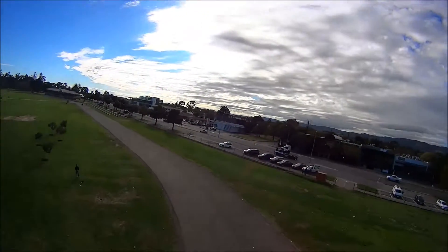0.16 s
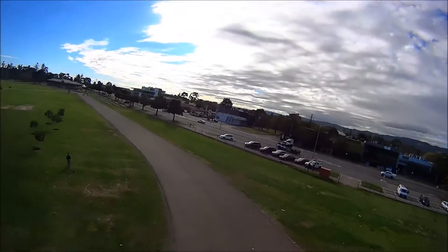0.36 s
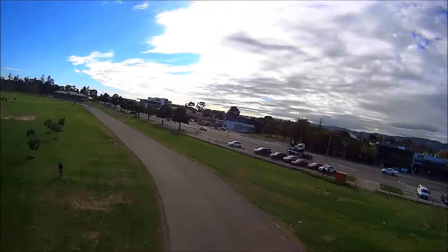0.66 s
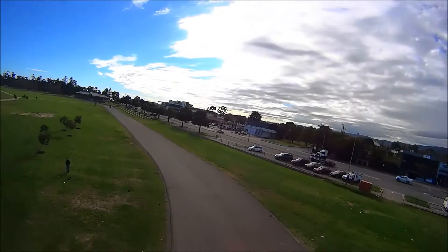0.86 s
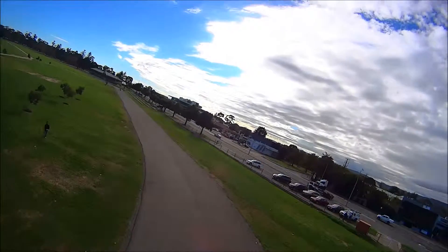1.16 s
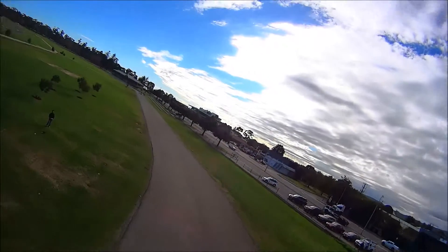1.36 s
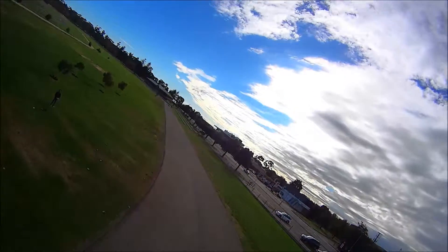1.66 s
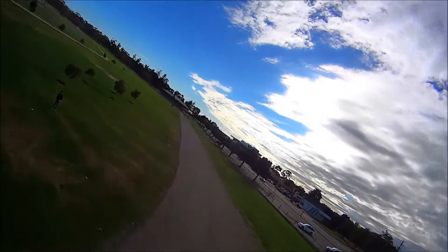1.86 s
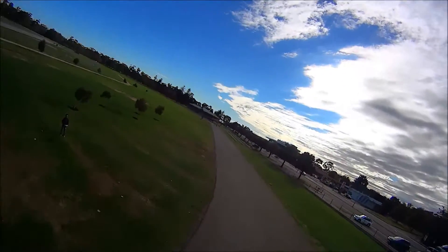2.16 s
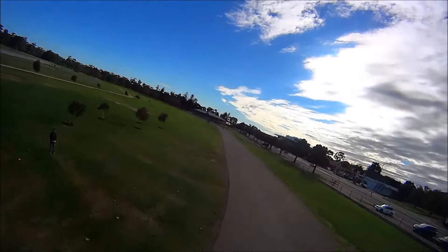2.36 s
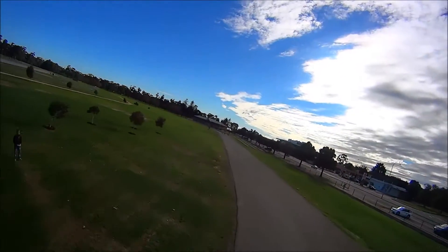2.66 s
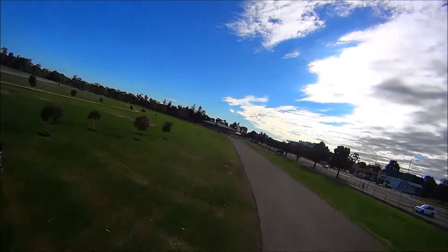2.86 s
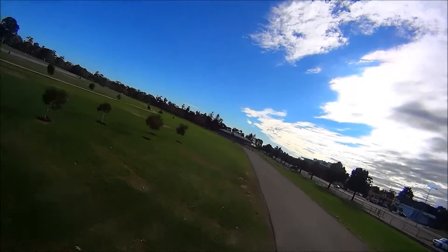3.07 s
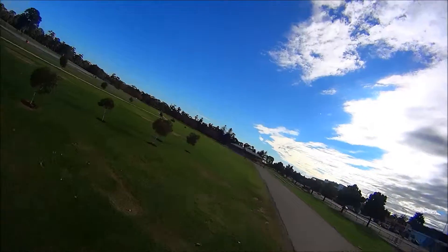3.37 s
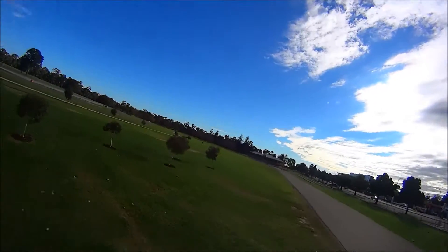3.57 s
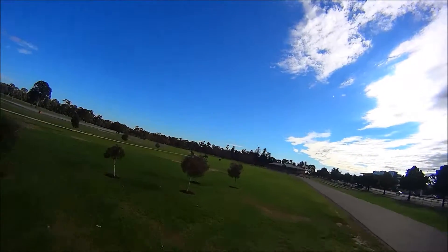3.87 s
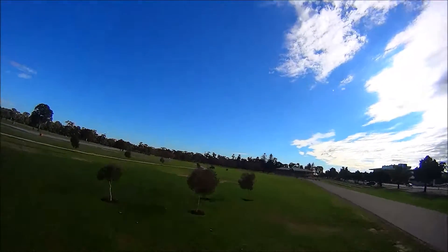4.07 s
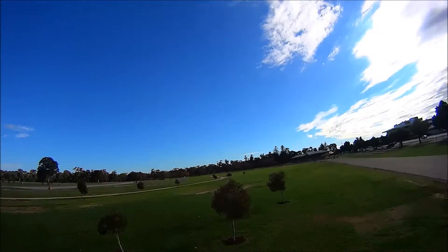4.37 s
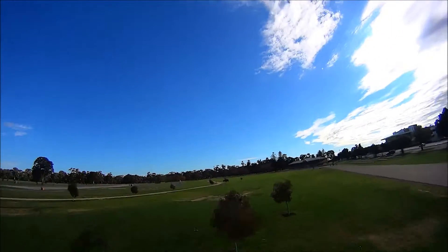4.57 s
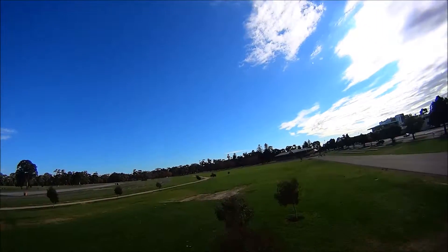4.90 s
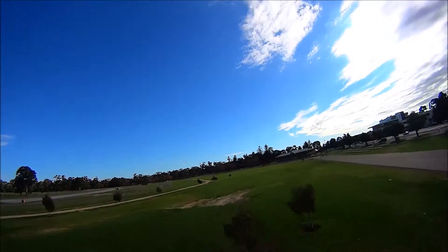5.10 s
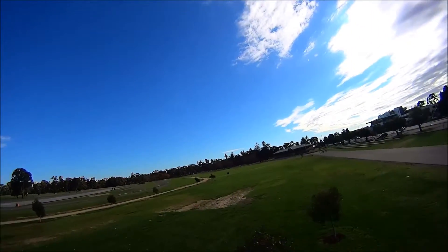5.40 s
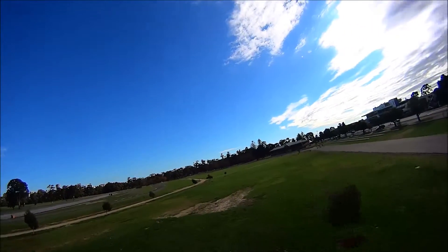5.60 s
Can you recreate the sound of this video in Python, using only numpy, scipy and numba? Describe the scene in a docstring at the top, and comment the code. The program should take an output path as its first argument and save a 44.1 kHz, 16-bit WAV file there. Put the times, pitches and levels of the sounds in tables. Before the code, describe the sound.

Air rushes over a small microphone on a model glider flying in the open. Low buffeting and a bright hiss swell and ease in uneven gusts. In the first two seconds the rumble drops away briefly a few times, then the wind runs on more steadily with only tiny dips. An idling propeller hums and whines faintly underneath, along with a very faint high electronic whistle.

```python
"""On a model glider in flight, air rushes over the microphone of a small camera.
Swirls of air (eddies) buffet the microphone and now and then let go. The camera case rings and hisses
with the flow, and the airframe murmurs. An idling propeller hums and whines, and the electronics
whistle faintly. Gain control turns the sound down whenever the wind gets loud."""
import sys
import numpy as np
from scipy import signal
from scipy.fft import rfft, irfft, next_fast_len
from scipy.io import wavfile
from scipy.ndimage import uniform_filter1d
from numba import njit

SR = 44100
rng = np.random.default_rng(int(sys.argv[2]) if len(sys.argv) > 2 else 0)


def unload_wav(signal):
    """Save mono or channel-first audio to the path in sys.argv[1] as 16-bit WAV at rate SR, clipped to [-1, 1]."""
    wavfile.write(
        sys.argv[1],
        SR,
        np.round(np.clip(np.atleast_2d(signal).T, -1, 1) * 32767).astype(np.int16),
    )


N = 253134

# How strongly the air gusts across the microphone: (time [s], level [dB])
FLOW = [(0, -31.5), (.088, -33), (.097, -29.5), (.2, -24.5), (.3, -16.5), (.43, -15.5), (.5, -21),
        (.547, -26.5), (.56, -35), (.62, -35), (.75, -32.5), (.85, -28), (.874, -28.5), (.884, -22.5),
        (.99, -19.5), (1.14, -25), (1.165, -26.5), (1.22, -33.5), (1.36, -28.5), (1.412, -27.5),
        (1.424, -25), (1.5, -17), (1.85, -26.5), (1.865, -31), (2.01, -26), (2.024, -27), (2.11, -17.5),
        (2.3, -17.5), (2.5, -13.5), (2.7, -20.5), (2.8, -31), (2.95, -23), (3.12, -16), (3.53, -29),
        (3.555, -25.5), (3.62, -20.5), (3.89, -18.5), (4.2, -22.5), (4.35, -22), (4.6, -16.5),
        (4.85, -22.5), (5.13, -26), (5.28, -20.5), (5.4, -19.5), (5.74, -24.5)]
# Tone colour of the buffeting and of its deep throb: (frequency [Hz], relative level [dB])
BUFFET_COLOUR = [(22, -27.5), (43, -20.5), (83, -8), (140, -0.5), (203, -2.5), (368, -1.5), (467.5, -4),
                 (579, -7.5), (667, -12), (804, -12.5), (1250, -19), (1350, -28.5), (1760, -46)]
THROB_COLOUR = [(260, -28.5), (335, -2.5), (385, -3), (435, -5), (520, -20.5)]
# The throb comes and goes: (time [s], level against the buffeting [dB])
THROB_LEVEL = [(0, -12), (.33, -7), (.55, -10.5), (1, -2.5), (1.15, -12), (2.2, -9.5), (2.4, -3.5),
               (2.6, -7.5), (2.75, -18.5), (3.2, -13), (3.6, -10.5), (3.85, -3.5), (4.05, -3), (4.2, -18),
               (4.35, -1.5), (4.45, -4.5), (4.58, 0), (4.75, -9), (5.1, -10), (5.3, -2), (5.42, -7),
               (5.55, -6.5), (5.74, -15)]
# Lulls, when the eddies let go:
# (start [s], length [s], depth [dB], delay to second stage [s], depth then [times the first])
LULLS = [(-.03, 0.046, 14, .035, .6), (0.052, 0.043, 13, .03, 1.1), (0.546, 0.336, 11, .212, 0.55),
         (1.228, .194, 10, .14, 0.45), (1.852, 0.17, 11.5, .1, .6), (3.456, 0.097, 7, .06, .6)]
# The sound ducks briefly, as gain control does after a peak: (time [s], depth [dB])
DUCKS = [(0.263, 23), (.99, 6), (2.291, 7.5), (2.691, 5.5), (3.101, 10), (3.61, 6), (4.203, 14), (4.94, -1),
         (5.341, 8.5)]
# Tone colour of the ringing case and of the edge hiss: (frequency [Hz], relative level [dB])
CASE_COLOUR = [(880, -17), (1210, -6), (1450, 3.5), (1573, -1.5), (1948, -4.5), (2395, -15), (2860, -40)]
EDGE_COLOUR = [(2000, -21), (2490, 1), (2880, 3), (3350, -2), (3890, -10), (4230, -3), (4630, -11.5),
               (4970, -12.5), (5550, -13.5), (6060, -11), (6540, -18), (7300, -22.5), (8600, -25.5),
               (11100, -40)]
# How loudly the case rings: (time [s], level against the flow [dB])
CASE_LEVEL = [(0, -9), (.15, -2), (.4, 0.5), (.6, -3), (.9, -1), (1.15, 2.5), (1.45, -3), (1.6, 1.5),
              (1.8, -0.5), (2.2, 0.5), (2.45, 2.5), (2.65, -1.5), (3.05, 0.5), (3.5, 0), (3.9, 0),
              (4.1, -2), (4.45, 2), (4.7, -0.5), (5.1, -1.5), (5.269, 1.5), (5.399, 0.5), (5.74, -2.5)]
# The edge hiss rises and falls with the glider's speed: (time [s], boost [dB])
SPEED_BOOST = [(0, -10), (.3, 0), (.55, -2.5), (1.6, 1), (2.0, -0.5), (2.4, 2.5), (2.7, -0.5), (3, 1),
               (3.5, 0), (4.0, -0.5), (4.35, 1), (4.6, 0.5), (4.85, 0), (5.1, -1.5), (5.5, -1.5),
               (5.74, -2)]
# How the wind sounds in the right channel, compared with the left:
# (frequency [Hz], right minus left [dB], right lead [rad], likeness [0-1])
STEREO_SPREAD = [(30, .3, .9, .75), (80, 1, .85, .84), (130, 1.5, .85, .985), (300, .6, 1.05, .99),
                 (470, -1.5, .9, .98), (560, -5, .5, .92), (650, -11, .2, .5), (690, -14, 1.6, .1),
                 (730, -12, 3, .7), (820, -7.2, 2.7, .95), (990, -4, 2.25, .99), (1290, -.5, 1.55, .99),
                 (1420, -1.3, 1.1, .99), (1600, -5.5, .8, .97), (1720, -5, .9, .98), (2000, -7.6, .55, .98),
                 (2240, -9.6, -.1, .88), (2540, -13, -1.8, .2), (2800, -11.5, -5.2, .68),
                 (3050, -8.5, -8, .2), (3350, -7, -11.2, .62), (3750, -11.5, -13.5, .15),
                 (4300, -5.3, -16.1, .82), (4800, 1, -17.6, .25), (5200, -.5, -18.2, .8),
                 (5700, -6, -18.6, .6), (6100, -11, -20.2, .5), (7150, 0, -23.7, .55),
                 (8000, -2, -28.2, .4), (9000, 1, -30.9, .55), (9900, 0, -31.4, .93)]
# Tone colour of the airframe murmur and of the preamplifier hiss:
# (frequency [Hz], left level [dB], right level [dB], right lead [rad], likeness [0-1])
AIRFRAME_COLOUR = [(30, -1, -2, 1, 0.6), (130, 1, 2.5, .9, 0.8), (400, -7.5, -5.5, .9, 1),
                   (550, -16, -12.5, 3.4, 0.61), (760, -19.5, -19, 7.5, 0.5), (970, -15, -18.5, 3.1, 0.83),
                   (1240, -16.5, -19.5, 5.4, 0.95), (1550, -2.5, -2.5, 1.3, .95),
                   (2170, -8.5, -14, .1, 0.7), (2670, -23, -28.5, 1.1, .4), (3320, -22.5, -20, 1.1, 0.5),
                   (3800, -39, -37.5, 3, .6), (4400, -35, -30, 2.5, 0.8), (5040, -41, -37, .6, 0.71),
                   (6000, -51, -44.5, .5, .5)]
PREAMP_COLOUR = [(5000, -18, -15.5, 1.5, .5), (6840, 1.5, -5, -3, .5), (7600, 3, 5, -2, .5),
                 (7800, -4.5, -3, -1.5, .3), (8150, -1, -2.5, -1.5, 0.41), (8500, -7.5, -3.5, -3.5, .45),
                 (8700, 0, 2, -4, .55), (9300, -14.5, -13, -7, .7), (10200, -4, -5.5, -5, .93),
                 (10660, -14, -12.5, -8, 0.99), (11400, -22.5, -16.5, -6, 0.9)]
# The idling propeller: (time [s], shaft rate [Hz], hum level [dB], whine level [dB])
PROPELLER = [(0, 70.8, -33.5, -60), (.3, 72.8, -32, -40), (.42, 73.65, -37, -28), (.52, 75.05, -26, -30),
             (.6, 74.05, -34.5, -35), (.85, 75.4, -34.5, -35), (.93, 76, -34, -29), (.99, 75, -36, -40),
             (1.07, 74.8, -33, -31), (1.2, 75.3, -30, -35.5), (1.3, 76.1, -31.5, -32),
             (1.42, 76.9, -32, -31), (1.5, 77.2, -34, -47), (1.64, 76.66, -43, -30), (1.7, 77.7, -32, -29),
             (1.82, 77.2, -31, -32), (1.9, 77.1, -33, -31), (2.05, 77.2, -32, -32), (2.11, 76, -35, -44),
             (2.28, 77, -32, -43), (2.36, 76.6, -34, -23.5), (2.6, 78.2, -29, -25.5),
             (2.8, 77.1, -39, -36.5), (3.05, 77.5, -35, -30), (3.13, 77.8, -38, -45),
             (3.24, 78.5, -30, -38), (3.34, 78.5, -32, -34.5), (3.57, 77.5, -33, -35),
             (3.65, 77.9, -32, -40), (3.9, 79, -39, -35.5), (5.74, 76.9, -39, -38)]
# Tones of the hum, by multiple of the shaft rate:
# (level against the hum [dB], right minus left [dB], right lead [rad])
HUM_TONES = {1: (.1, -.1, 1.2), 3: (-6, 2.5, 0.94), 4: (-5.5, 2.2, 1), 5: (-15, 2.3, 0.71),
             6: (-14.5, 11, 0.3), 7: (-19, 6.9, 0.7), 8: (-6.5, -.5, 2.2), 9: (-15, -2.2, 0.34),
             10: (-27, -.5, 0.93), 11: (-15, -3.4, 3), 12: (-12, -2.7, 2.4), 14: (-15.5, -2.5, 1.5),
             15: (-20, -1.5, 6.9)}
# The fine treble hiss swells, mostly late in the lulls: (time [s], boost [dB])
TREBLE_BOOST = [(0, 0), (.2, 1), (.45, 7.5), (.6, 0.5), (.89, 5.5), (.97, 0), (1.25, 3), (1.4, 4),
                (1.55, 1.5), (1.95, 4), (2.15, 1), (2.5, 0), (2.9, 0), (3.2, 0.5), (3.45, 2), (3.56, 3),
                (3.63, 0), (4.5, -0.5), (5, -1.5), (5.74, -2)]
# A thin, wandering whistle: (time [s], pitch [Hz], level [dB])
THIN_WHISTLE = [(.4, 6100, -79), (.6, 6240, -66), (1.0, 6350, -66), (1.4, 6283, -66), (2.0, 6340, -67),
                (2.3, 6150, -60.5), (3.5, 6250, -71.5), (4.5, 6100, -62), (5.74, 6180, -71)]


def wind():
    """Moving air makes four sounds; the same small gusts shake the eddies, case and edge hiss."""
    flow_db, = curves(FLOW)
    gusts = 0.53 * walk(18) + 2.23 * walk(90)
    duck_db = ducking()
    # the edge hiss is -38 dB at a middling flow of -23 dB, before the speed boost
    edge_db = -38 + 0.87 * (flow_db + 23) + curves(SPEED_BOOST)[0]
    return (eddies(flow_db + 13.5 - 0.27 * duck_db + 0.38 * gusts)
            + ringing_case(flow_db - duck_db + 0.65 * gusts)
            + edge_hiss(edge_db - duck_db + 0.43 * gusts)
            + airframe(edge_db))


def eddies(db):
    """Swirls of air beat on the microphone, at times gathering into a deep throb."""
    buffet = stereo_noise(BUFFET_COLOUR, db + 0.93 * walk(45) + 0.74 * walk(12))
    throb = stereo_noise(THROB_COLOUR, db + curves(THROB_LEVEL)[0] + 1.5 * walk(30))
    return undb(-lulls()) * (buffet + throb)


def lulls(let_go_s=0.01, grip_s=0.005):
    """Level lost (dB) as the eddies let go: a sudden drop, mostly a part return, then a full one."""
    t = np.arange(N) / SR
    loss_db = np.zeros(N)
    for start, length, depth_db, delay, share in LULLS:
        times = np.maximum.accumulate([0, let_go_s, delay, delay + grip_s, length - grip_s, length])
        loss_db += depth_db * np.interp(t - start, times, [0, 1, 1, share, share, 0])
    return loss_db


def ducking(half_width_s=0.015):
    """Level lost (dB) as the sound ducks at set times, the way gain control does after a peak."""
    t = np.arange(N) / SR
    return sum(depth_db * np.exp(-((t - when) / half_width_s) ** 2) for when, depth_db in DUCKS)


def ringing_case(db):
    """The flow makes the camera case ring, giving a mid-pitched rush."""
    return stereo_noise(CASE_COLOUR, db + curves(CASE_LEVEL)[0] + 0.75 * walk(24.95))


def edge_hiss(db):
    """Air passing the edges of the case makes a bright, flickering hiss."""
    return stereo_noise(EDGE_COLOUR, db + 1.2 * walk(200))


def airframe(edge_db, level_db=-29.5):
    """The glider's body murmurs on through the lulls, following the flow only a little."""
    return stereo_noise(AIRFRAME_COLOUR, level_db + 0.17 * (edge_db - edge_db.mean()) + 0.7 * walk(10))


def propeller(whine_multiple=13, sizzle_multiple=66):
    """The spinning propeller gives a hum, a whine and a narrow hiss, at multiples of its shaft rate."""
    shaft_hz, hum_db, whine_db = curves(PROPELLER)
    angle = 2 * np.pi * np.cumsum(shaft_hz * (1 + 0.00091 * walk(12))) / SR
    flutter_db = [3.5 * walk(40) for _ in range(3)]  # neighbouring tones flutter separately
    hum = 0
    for multiple, (tone_db, right_db, lead) in HUM_TONES.items():
        db = hum_db + tone_db + (multiple > 1) * flutter_db[multiple % 3]
        hum += tone(multiple * angle + multiple ** 2, db, lead, right_db)
    flicker = walk(1200)  # fast enough to smear a tone into a hiss
    sizzle_db = -60.5 + 1.8 * curves(TREBLE_BOOST)[0] + 3.4 * walk(14)
    sizzle = flicker * tone(sizzle_multiple * angle, sizzle_db, lead=-0.95, right_db=0.5)
    whine = tone(whine_multiple * angle, whine_db + 1.8 * walk(25), lead=1.77, right_db=-2.5)
    return hum + sizzle + whine


def electronics(whistle_hz=7874.3, settle_s=1.2):
    """The circuits add a soft hiss, a whistle of steady pitch and a fainter one that wanders."""
    t = np.arange(N) / SR
    thin_hz, thin_db = curves(THIN_WHISTLE)
    thin = tone(2 * np.pi * np.cumsum(thin_hz + 6 * walk(30)) / SR, thin_db, lead=-1.3, right_db=1)
    whistle_db = -56.5 + 3 * np.exp(-t / settle_s)  # starts stronger, then settles
    whistle = tone(2 * np.pi * whistle_hz * t, whistle_db, lead=2.75, right_db=-3.8)
    hiss = stereo_noise(PREAMP_COLOUR, -59 + curves(TREBLE_BOOST)[0] + 1.3 * walk(18))
    return hiss + whistle + thin


def stereo_noise(table, db):
    """Noise with a table's tone colour; the right channel is shifted in phase and partly unrelated."""
    size = next_fast_len(N)
    log_hz = np.log(np.maximum(np.arange(size // 2 + 1) * SR / size, 1))

    def fill_in(rows):
        hz, *columns = np.transpose(rows)
        return [np.interp(log_hz, np.log(hz), column) for column in columns]

    left_db, *right = fill_in(table)
    if not right:  # two-column tables all use the same stereo spread
        right = fill_in(STEREO_SPREAD)
        right[0] += left_db
    right_db, lead, likeness = right
    colour = undb([left_db, right_db]) * (log_hz < np.log(table[-1][0]))  # silent above the last row
    colour /= np.sqrt(np.mean(colour ** 2))
    shared, own = rfft(rng.standard_normal((2, N)) * undb(db), size)
    right_noise = np.exp(1j * lead) * (likeness * shared + np.sqrt(1 - likeness ** 2) * own)
    return irfft(colour * np.array([shared, right_noise]), size)[:, :N]


def tone(phase, db, lead, right_db):
    """A pure tone of average (rms) level db; on the right it is lead radians ahead and right_db louder."""
    return np.sqrt(2) * undb(db) * np.array([np.sin(phase), undb(right_db) * np.sin(phase + lead)])


def walk(rate):
    """A smooth random wobble, about 1 in size, with rate new values a second."""
    hold = int(SR / rate)
    steps = np.repeat(rng.standard_normal(N // hold + 1), hold)
    return 1.32 * uniform_filter1d(uniform_filter1d(steps, hold), hold)[:N]


def curves(table):
    """Join a time table's points with lines: one curve per column, one value per sample."""
    times, *columns = np.transpose(table)
    return [np.interp(np.arange(N) / SR, times, column) for column in columns]


def undb(db):
    """Turn decibels into a number to multiply by."""
    return 10 ** (np.asarray(db) / 20)


@njit
def follow(x, attack, release):
    """Track how loud a sound is: quick to rise, slower to fall."""
    levels, level = np.empty(len(x)), 0.
    for i in range(len(x)):
        level += (x[i] - level) * (attack if x[i] > level else release)
        levels[i] = level
    return levels


def scene():
    """All the sounds together, left and right."""
    return wind() + propeller() + electronics()


def record(dry, knee_db=-11.5, ratio=3.9, attack_s=0.0023, release_s=0.039, top_hz=10850):
    """Gain control turns down sound above the knee level; peaks are rounded and the top treble is cut."""
    loudness = follow(np.abs(dry).mean(0), 1 / (attack_s * SR), 1 / (release_s * SR))
    gain = np.minimum(undb(knee_db) / (loudness + 1e-9), 1) ** (1 - 1 / ratio)
    ceiling = np.array([[0.92], [0.84]])  # left, right
    rounded = ceiling * np.tanh(dry * gain / ceiling)
    return signal.sosfilt(signal.ellip(10, 0.2, 70, top_hz, fs=SR, output="sos"), rounded)


dry = scene()
out = record(dry)
unload_wav(out)
```